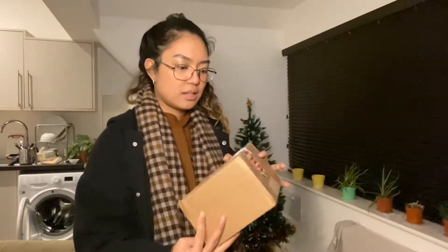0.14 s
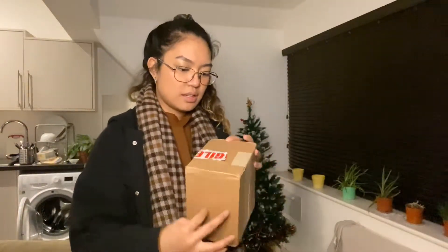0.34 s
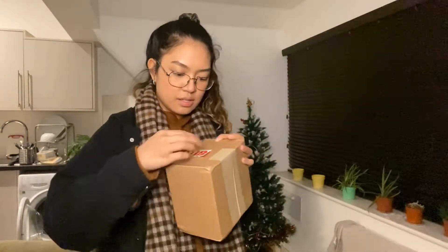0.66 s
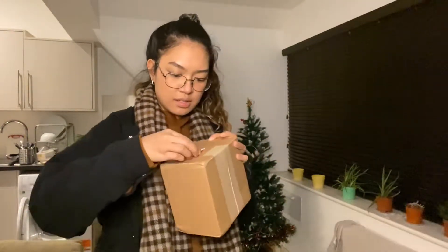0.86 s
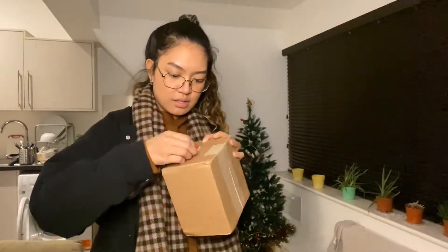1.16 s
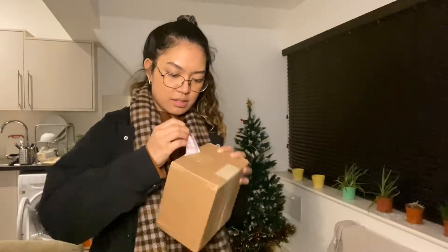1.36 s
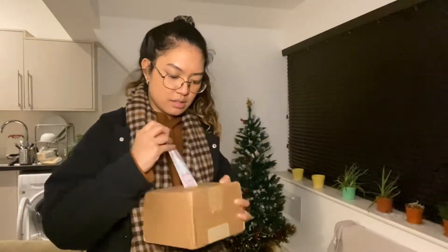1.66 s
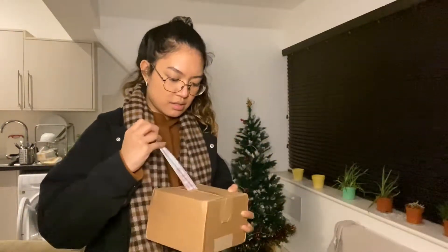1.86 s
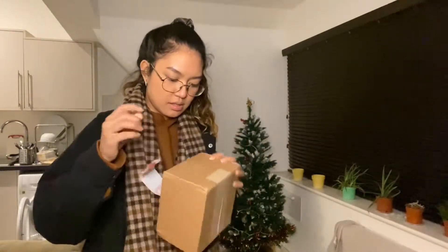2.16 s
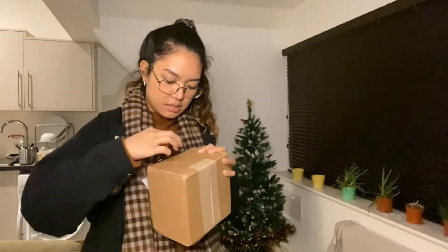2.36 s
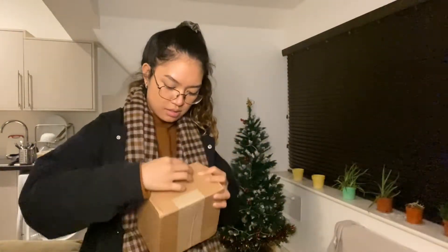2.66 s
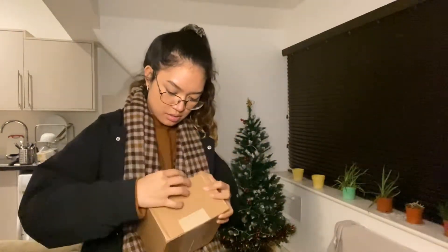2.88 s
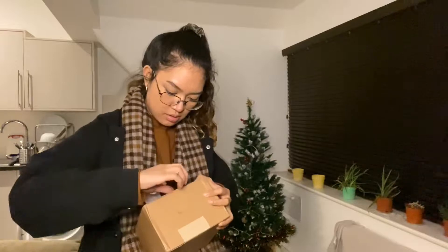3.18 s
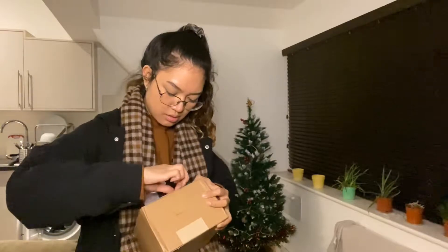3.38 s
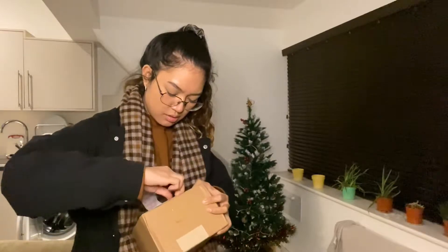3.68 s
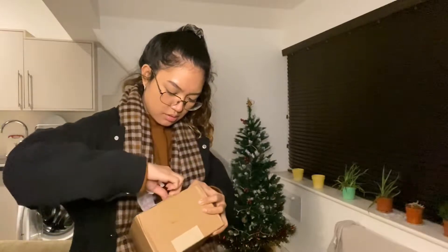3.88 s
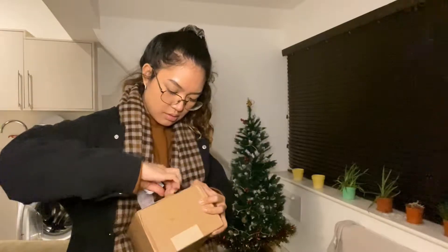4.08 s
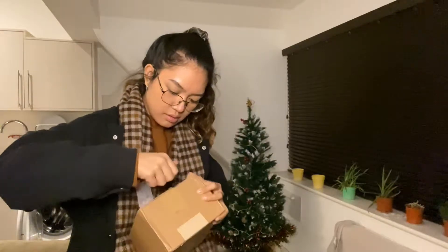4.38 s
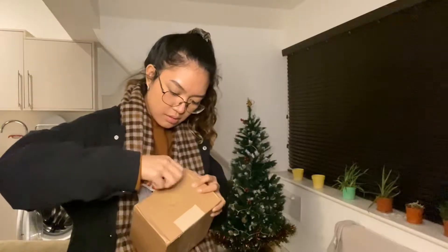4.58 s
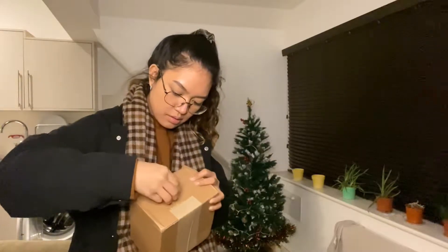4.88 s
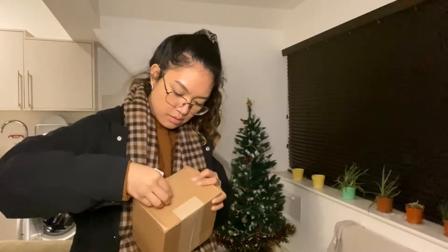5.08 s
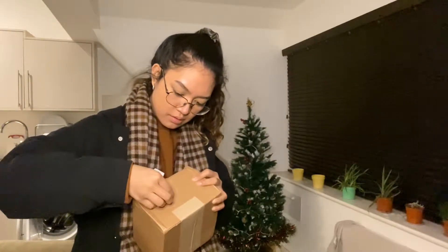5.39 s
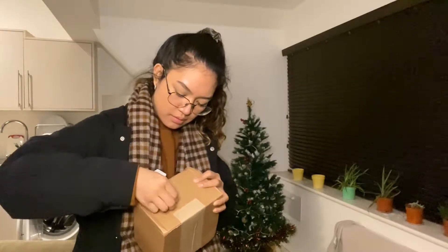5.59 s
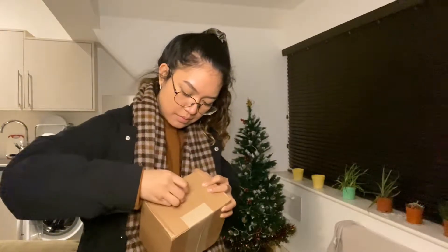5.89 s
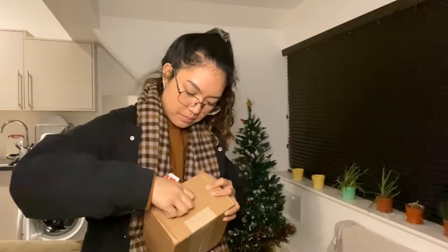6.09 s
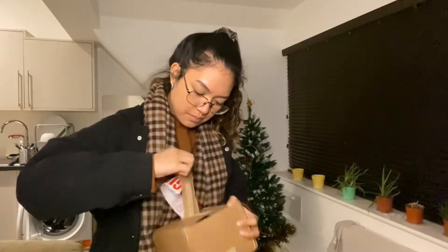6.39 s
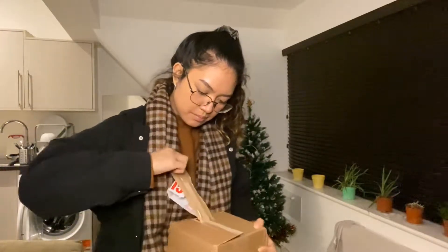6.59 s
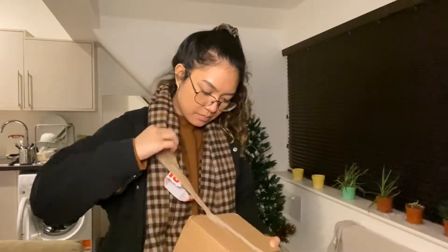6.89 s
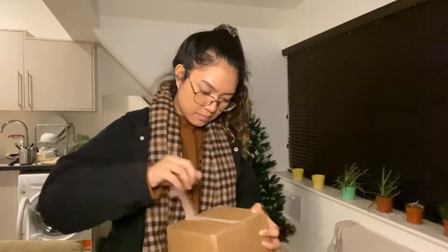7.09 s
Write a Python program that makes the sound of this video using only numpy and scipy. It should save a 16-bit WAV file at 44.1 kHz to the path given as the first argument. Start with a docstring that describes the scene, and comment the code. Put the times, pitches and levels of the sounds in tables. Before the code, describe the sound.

Close sticky tape crackles, snaps and tears away from a hollow cardboard box in several bursts, over a low room hum.

```python
"""Peeling packing tape off a small box

Glue lets go in dense crackles and single snaps that ring the cardboard, while the taut strip flaps
and rasps. Fingers rub the card and the loose end of the tape ticks. A kitchen-living room rings on
over a low hum, all heard in stereo close to the box."""
import sys
import numpy as np
from scipy import signal
from scipy.fft import rfft, irfft
from scipy.io import wavfile
from scipy.ndimage import uniform_filter1d

SR = 44100
rng = np.random.default_rng(int(sys.argv[2]) if len(sys.argv) > 2 else 0)


def generate_wav(signal):
    """Clip the signal to [-1, 1] and save it as 16-bit WAV at the path in sys.argv[1]."""
    frames = np.transpose(np.atleast_2d(signal))
    scaled = np.clip(frames, -1, 1) * 32767
    pcm = np.round(scaled).astype(np.int16)
    wavfile.write(sys.argv[1], SR, pcm)


N = 319725
TIME = np.arange(N) / SR


def undb(db):
    return 10 ** (np.asarray(db) / 20)


def unit_rms(x):
    return x / np.sqrt(np.mean(x ** 2))


def convolve(x, impulse):
    return signal.fftconvolve(x, impulse)[:N]


def colour(x, curve, size=4096):
    """Causal EQ through (Hz, dB) points, built from the folded cepstrum."""
    hz, db = np.transpose(curve)
    bins_hz = np.fft.rfftfreq(size, 1 / SR) + 1
    cepstrum = irfft(np.log(undb(np.interp(np.log(bins_hz), np.log(hz), db))))
    cepstrum[1:size // 2] *= 2
    cepstrum[size // 2 + 1:] = 0
    return convolve(x, irfft(np.exp(rfft(cepstrum))))


def wander(per_s):
    """A random control signal that glides from step to step, with a spread near 1."""
    hold = int(SR / per_s)
    return uniform_filter1d(np.repeat(rng.standard_normal(N // hold + 1), hold), hold // 2)[:N]


def grains(per_s, spread_db):
    """Clicks at random moments, many small and a few large."""
    clicks = (rng.random(N) < per_s / SR) * rng.standard_normal(N)
    return unit_rms(clicks * undb(spread_db * np.minimum(rng.exponential(size=N), 3)))


def ring(force, modes, drift_db=1.6):
    """Resonances with a soft attack; as the contact point moves, each is driven more or less."""
    t = np.arange(SR // 8) / SR
    out, power = 0, 0
    for k, (hz, width_hz, db) in enumerate(modes):
        motion = np.exp(-np.pi * width_hz * t) * (1 - np.exp(-2 * hz * t)) * np.sin(2 * np.pi * hz * t)
        gain = (-1) ** k * undb(db) * np.sqrt(width_hz) / hz
        impulse = gain * np.diff(motion, prepend=0)  # a steady push radiates nothing
        out = out + convolve(force * undb(drift_db * wander(9)), impulse)
        power += np.sum(impulse ** 2)
    return out / np.sqrt(power)


def friction(gains, air_eq, bodies, per_s, spread_db, jerk_db, jerks_per_s):
    """Stick and slip: one click train, heard in the air (first gain) and through each body (the rest)."""
    slips = unit_rms(grains(per_s, spread_db) * undb(jerk_db * wander(jerks_per_s)))
    air = gains[0] * unit_rms(colour(slips, air_eq))
    return air + sum(ring(gain * slips, modes) for gain, modes in zip(gains[1:], bodies))


# The tone of the background hum. Each row: frequency in Hz, relative level in dB.
HUM_EQ = [(25, -20), (50, -5), (92, -2.5), (123, -9.5), (235, -1), (262, -11), (293, -1), (545, -27.5),
          (760, -23), (5000, -48.5), (6500, -98.5)]


def hum(level_db=-49.5):
    """A low bed of appliances and the street through the walls, swelling a little."""
    swell = undb(1.2 * wander(4))
    return undb(level_db) * swell * unit_rms(colour(rng.standard_normal(N), HUM_EQ))


# The room's reverb tail. Each row: band centre in Hz, seconds to die away by 60 dB.
ROOM_DECAY = [(150, 0.047), (400, 0.44), (1000, 0.46), (2500, 0.44), (6000, 0.49), (12000, 0.27)]


def echoes(gap_s=0.0018, early_db=9.0, early_s=0.0062):
    """Strong first echoes off hands, body and desk, then a diffuse tail, each band at its own pace."""
    t = np.arange(int(.7 * SR)) / SR
    tail = 0
    for hz, decay_s in ROOM_DECAY:
        band_eq = [(hz / 2.5, -30), (hz / 1.5, 0), (hz * 1.5, 0), (hz * 2.5, -30)]
        band = colour(rng.standard_normal(len(t)), band_eq)[:len(t)]
        tail = tail + band * 1000 ** (-t / max(decay_s, .05))
    onset = np.clip(t / gap_s - 1, 0, 1)
    early_boost = 1 + undb(early_db) * np.exp(-t / early_s)
    tail = tail * onset * early_boost
    return tail / np.sqrt(np.sum(tail ** 2))


def room(x, places=5, step_s=.11):
    """The box keeps moving, so the reverb crossfades round a loop of echo patterns."""
    out = 0
    for k in range(places):
        steps_away = np.abs((TIME / step_s - k + places / 2) % places - places / 2)
        send = np.cos(np.pi / 2 * np.minimum(steps_away, 1))
        out = out + convolve(x * send, echoes())
    return out


# The bright tone of every tape tick, crackle and crack. Each row: frequency in Hz, gain in dB.
CRACKLE_EQ = [(1500, -45.5), (2800, 1.5), (4000, 2), (8500, 2), (11000, 5.5), (16000, -0.5)]
# Spells of fingering the loose tape. Each row: start in seconds, length in seconds, level in dB.
TICK_SPELLS = [(4.45, 1.1, -81), (1.006, 0.18, -53.5), (5.9, 0.48, -69.5), (6.929, 0.257, -54.5)]


def tape_ticks():
    """Sparse, thin clicks while the fingers hold the free end."""
    gain = sum(undb(db) * (TIME > start) * (TIME < start + length) for start, length, db in TICK_SPELLS)
    clicks = np.diff(grains(per_s=140, spread_db=7.0), prepend=0)
    return unit_rms(colour(clicks, CRACKLE_EQ)) * gain


# The hollow ring of the box, also under tugs and snaps. Each row: pitch in Hz, width in Hz, level in dB.
BOX_MODES = [(318, 58, 5.5), (386.4, 37, 8.5), (437.3, 60, 13.5), (525, 59, 5.5), (613, 130, 7.5)]
# The card's ridges under skin or nail. Each row: pitch in Hz, width in Hz, level in dB.
SCRAPE_MODES = [(800, 430, 0.5), (1362, 450, 3.5), (1747, 700, -1.5), (3580, 430, -12.5)]
# The hiss of rubbed card. Each row: frequency in Hz, gain in dB.
HISS_EQ = [(2000, -2), (3500, -2), (5500, -9.5), (9000, -6.5), (14000, -8.5)]
# The steady grip of one hand. Each row: one level in dB, for hiss, box ring and scrape in turn.
HAND_GRIP = [
    [-91],
    [-69],
    [-75.5],
]
# Strokes on the card. Each row: start in seconds, box ring in dB, scrape and hiss in dB relative to
# that ring, length in seconds.
RUB_STROKES = [(-.1, -52.5, -4.5, -7, 0.84), (0.083, -50.5, 2, -11, 0.059), (0.216, -54, -9.5, -7, 0.21),
               (0.729, -39.5, -11.5, -25, 0.072), (0.778, -53.5, -3, -15, 0.17),
               (0.89, -49.5, -3.5, -7.5, 0.18), (0.988, -52.5, -5, -4, 0.83), (1.9, -52, -5, 1.5, 0.33),
               (2.348, -64.5, -2, -0.5, 1), (2.712, -54, 5, -14, 0.1), (2.805, -46.5, -6.5, -22, 0.08),
               (3.061, -62.5, 8, 5.5, 0.1), (3.46, -57, -22, 0, 0.22), (3.742, -53, -3, 10.5, 0.65),
               (4.8, -52, -20, -47.5, 0.13), (4.956, -61.5, -2.5, -22, 0.092),
               (5.269, -47, -12, -23.5, 0.095), (5.367, -44.5, -20, -22, 0.082),
               (5.507, -68.5, 2, -22, 0.098), (5.87, -60.5, -5, 0.5, 0.47), (6.907, -66.5, 4, 8.5, 0.22),
               (7.041, -66.5, -13, 17, 0.31)]


def card_rubs():
    """Fingers and loose tape catch or slide on the card, each stroke swelling fast and fading slower."""
    gains = undb(HAND_GRIP)
    for start, ring_db, scrape_db, hiss_db, length in RUB_STROKES:
        progress = np.clip((TIME - start) / length, 0, 1)
        stroke = np.sin(np.pi * np.sqrt(progress)) ** 2
        gains = gains + np.outer(undb(ring_db + np.array([hiss_db, 0, scrape_db])), stroke)
    return friction(gains, HISS_EQ, (BOX_MODES, SCRAPE_MODES),
                    per_s=5000, spread_db=3.0, jerk_db=2.0, jerks_per_s=35)


# The taut strip flaps, its peeling edge rasps, and the box's large faces boom under a hard pull.
# Each row: pitch in Hz, width in Hz, level in dB.
FLAP_MODES = [(803, 290, 5), (937, 770, 2)]
RASP_MODES = [(1950, 670, 8.5), (2610, 1400, -4.5)]
BOOM_MODES = [(131.7, 29, 3), (244, 39, 3.5), (647, 56, 0)]
# Pulls on the tape. Each row: start in seconds, rise in seconds, seconds to fall 20 dB (played as 0.01
# at least), crackle in dB, then box ring, flap, rasp and boom in dB relative to the crackle.
TAPE_TUGS = [(1.118, 0.19, -0.08, -42, 5, 0, -9, -7.5), (1.288, 0.004, 0.1144, -24, 0, 2.5, -2.5, -18),
             (1.322, 0.0091, 0.157, -24.5, -7, -2, -2.5, -31),
             (1.394, 0.035, 0.0962, -23, -3.5, -10, -14.5, -14.5),
             (1.583, 0.054, -0.0844, -30, 6, -6, -8, -9.5),
             (1.611, 0.068, 0.16, -34, 3.5, -1.5, -3.5, -4.5), (5.6, 0.16, -0.16, -43.5, 8.5, -4, -6, -3),
             (6.18, 0.079, 0.0185, -28.5, 9.5, -3.5, 0, 0), (6.284, 0.073, -0.0059, -27, -2.5, -8, -6, -4),
             (6.35, 0.033, 0.1829, -32.5, 0, -6, -8.5, -0.5),
             (6.588, 0.12, 0.0639, -32, -1.5, -4.5, -8.5, 1.5)]


def tape_tugs(rise_power=0.67):
    """Glue gives way in a dense crackle: each tug builds up, lets go and dies away."""
    gains = 0
    for start, rise_s, fall_s, crackle_db, *bodies_db in TAPE_TUGS:
        build = np.clip((TIME - start) / rise_s, 0, 1) ** rise_power
        release = undb(-20 * np.maximum(TIME - start - rise_s, 0) / max(fall_s, .01))
        gains = gains + np.outer(undb(crackle_db + np.array([0] + bodies_db)), build * release)
    return friction(gains, CRACKLE_EQ, (BOX_MODES, FLAP_MODES, RASP_MODES, BOOM_MODES),
                    per_s=6000, spread_db=2.5, jerk_db=2.5, jerks_per_s=190)


# The card's ridges when struck. Each row: pitch in Hz, width in Hz, level in dB.
RIDGE_MODES = [(1050, 290, -7.5), (1798, 400, 1)]
# Single snaps of glue. Each row: start in seconds, crack in dB, then box ring, ridge ring and the
# crack's top end in dB relative to the crack.
GLUE_SNAPS = [(0.986, -30.5, 4, -13, 2.5), (1.0938, -25.5, 2, -14, -2), (1.1459, -15.5, 4.5, -9.5, -10),
              (1.1852, -11.5, -22, -29, -24), (1.2089, -9, 4.5, -6.5, -1), (1.267, -9.5, 1.5, -11, 3),
              (1.426, -3, -24, -3, -2), (1.5482, -14.5, 14, -3, 6), (1.5935, -16.5, 8, 4, 6),
              (1.9944, -9, -1, -15, -30), (2.391, -24, -15, -8, -21), (2.6462, -39.5, 25, 14, -12),
              (2.926, -22, -28, 8, -10.5), (3.2308, -27, 5.5, -1, 8), (3.489, -17, 7, 2, 9),
              (3.612, -18.5, 0.5, -18, -36), (3.789, -1.5, 1.5, -3, -2), (3.8561, -5.5, -26, -10.5, -11),
              (3.913, 0.5, -6.5, -28, -14), (3.993, -10.5, -3, -6, 2), (4.0145, -6, 0.5, -9, -16),
              (4.0788, -12, -27.5, -34, -14), (4.096, -8, -13, -15, -18), (4.135, 0.5, 0.5, -10.5, -14.5),
              (4.775, -34, -2, -4, 0), (4.7989, -40.5, 25, 1, -17), (5.3038, -41, 25, 1, -19),
              (5.597, -21.5, -13, -1, 3.5), (5.605, -21.5, 13.5, 3, 3), (5.636, -24, -14, 8, 4.5),
              (5.651, -15.5, 5, -2, 0), (5.671, -13.5, 10.5, -2.5, -3), (5.685, -13.5, -10, -20, -1),
              (5.694, -12.5, 6.5, -4, -8), (5.715, -1.5, 1, -4.5, -9), (5.732, -10, -7, -10, -16),
              (5.9157, -22, 11, -3.5, -11), (5.953, -23.5, 11.5, -3.5, -10), (5.9964, -26, 19.5, -2, -4),
              (6.033, -20.5, 1, -12, -15), (6.144, -16.5, -0.5, -7.5, -19), (6.165, -5.5, 2.5, -9, -9),
              (6.295, -6.5, -3, -2, -2), (6.316, -2.5, -19, -2, -2), (6.337, -3, -30, -16, 6),
              (7.0757, -15.5, -22, -13, -14)]


def glue_snaps(tear_s=0.0013, top_hz=7000, size=256):
    """Glue lets go in brief ragged tears, no two alike, and each one strikes the box and its ridges."""
    crack_low, crack_top, box_hits, ridge_hits = np.zeros((4, N))
    bursts = rng.standard_normal((len(GLUE_SNAPS), size)) * np.exp(-TIME[:size] / tear_s)
    spectra = rfft(bursts)
    tears = irfft(spectra / np.sqrt(np.abs(spectra)))  # ragged in time, fairly even in colour
    for (start, db, box_db, ridge_db, top_db), tear in zip(GLUE_SNAPS, tears):
        i = int(start * SR)
        tear = tear / np.sqrt(np.sum(tear ** 2))
        crack_low[i:i + size] += undb(db) * tear
        crack_top[i:i + size] += undb(db + top_db) * tear
        box_hits[i] += undb(db + box_db)
        ridge_hits[i] += undb(db + ridge_db)
    lowpass, highpass = (signal.butter(2, top_hz, kind, fs=SR, output="sos") for kind in ("low", "high"))
    crack = signal.sosfilt(lowpass, crack_low) - signal.sosfilt(highpass, crack_top)
    knock = ring(box_hits, BOX_MODES, drift_db=3.0) + ring(ridge_hits, RIDGE_MODES, drift_db=3.0)
    return colour(crack, CRACKLE_EQ) + knock


def scene():
    """The box sits near the centre, with reverb and hum spread wide to left and right."""
    box = tape_tugs() + card_rubs() + glue_snaps() + tape_ticks()
    mid = box + undb(-3.0) * room(box) + hum()
    side = undb(-34.0) * box + undb(3.5) * room(box) + undb(6.5) * hum()
    return np.array([mid + side, mid - side])


# The tone of the stereo centre (mid) and width (side). Each row: frequency in Hz, gain in dB.
MID_EQ = [(12000, 3), (13500, -0.5), (14600, -23), (16500, -32.5)]
SIDE_EQ = [(100, -14.5), (250, -11), (700, -1.5), (2000, -4), (5500, -2.5), (7500, -10.5), (9000, -36.5),
           (10500, -3), (13000, 3), (16000, 2)]


def record(dry, ceiling=.75, cutoff_hz=16800):
    """Colour mid and side separately, round the loudest peaks and cut the highest treble."""
    mid = colour((dry[0] + dry[1]) / 2, MID_EQ)
    side = colour((dry[0] - dry[1]) / 2, SIDE_EQ)
    rounded = ceiling * np.tanh(np.array([mid + side, mid - side]) / ceiling)
    return signal.sosfilt(signal.ellip(10, .2, 90, cutoff_hz, fs=SR, output="sos"), rounded)


dry = scene()
out = record(dry)
generate_wav(out)
```